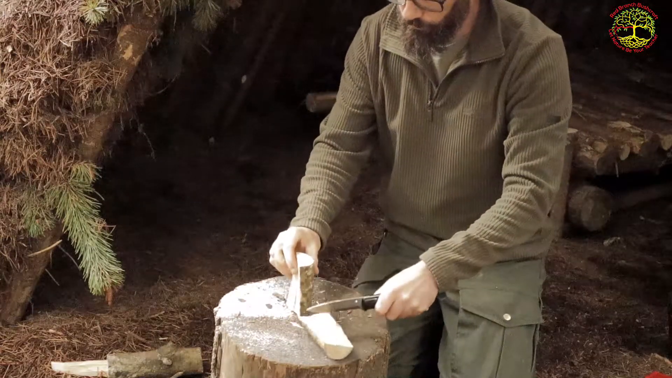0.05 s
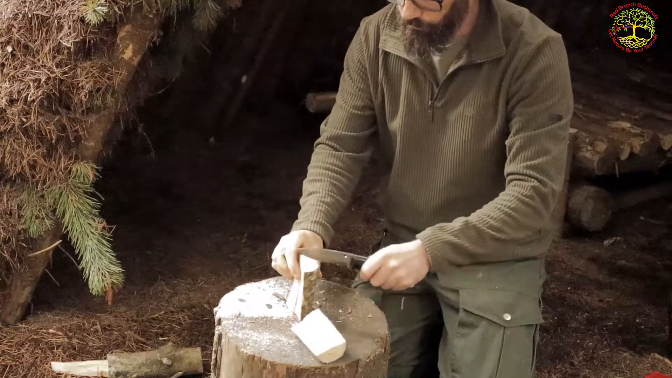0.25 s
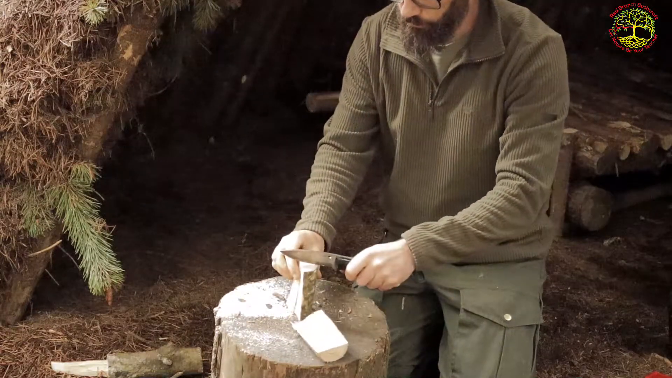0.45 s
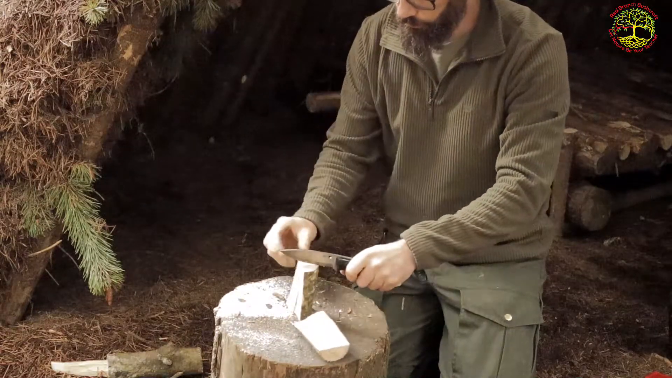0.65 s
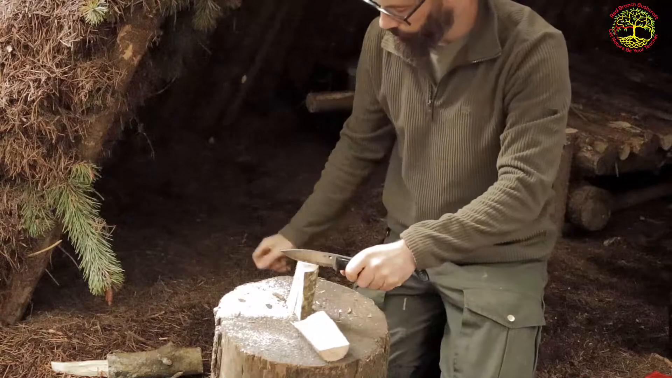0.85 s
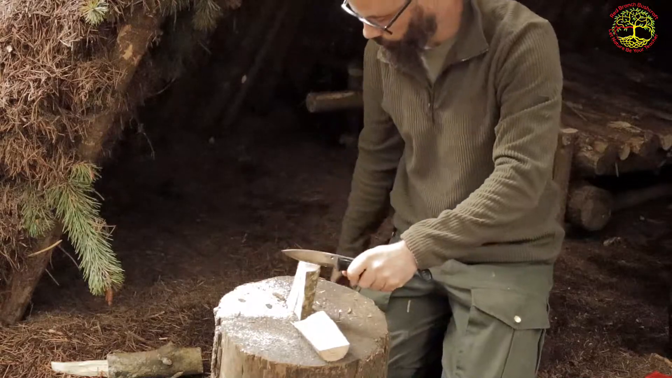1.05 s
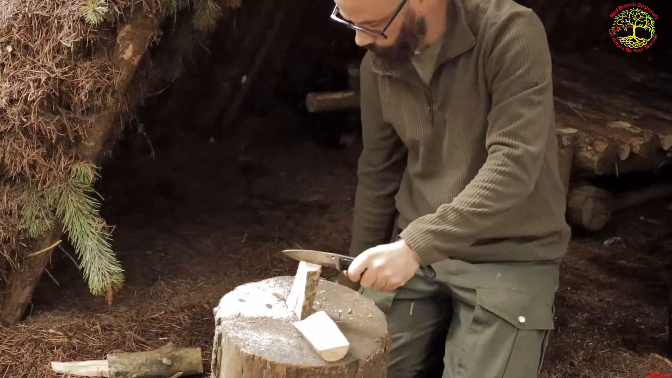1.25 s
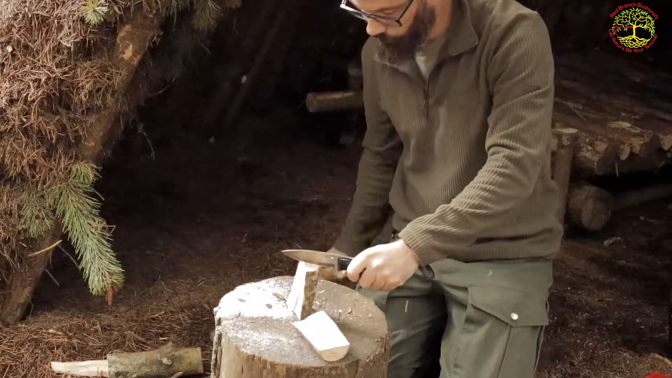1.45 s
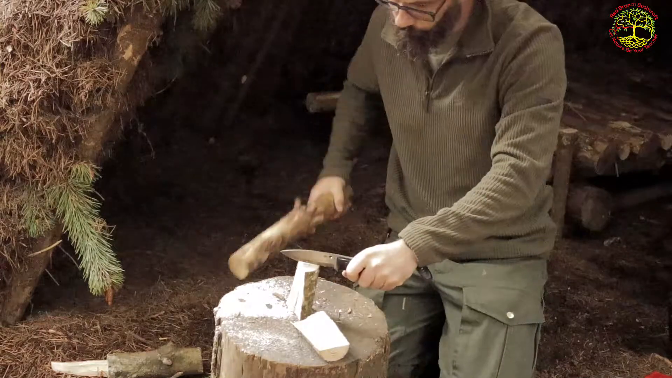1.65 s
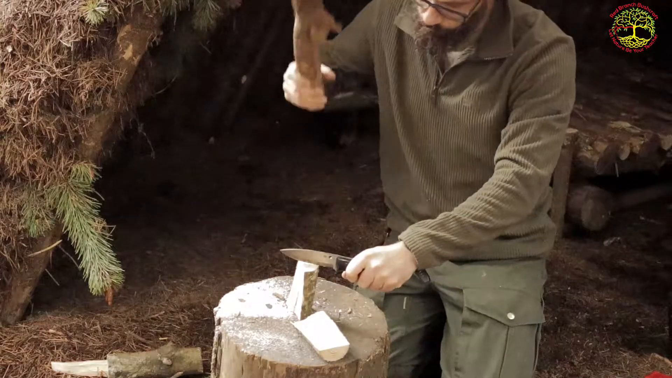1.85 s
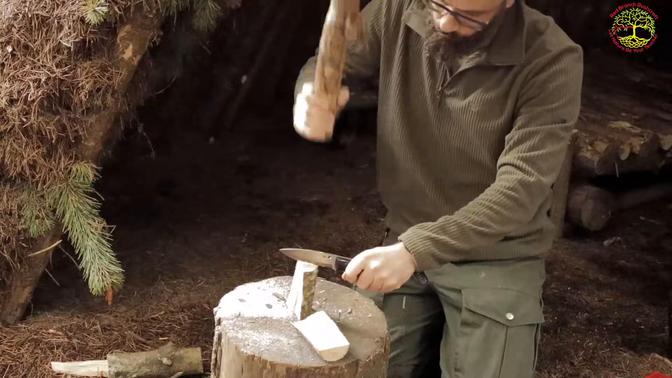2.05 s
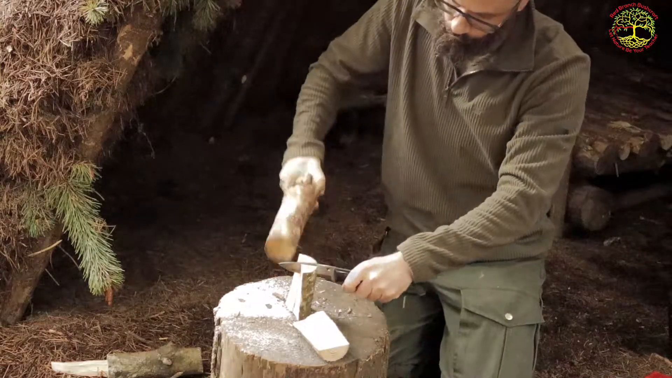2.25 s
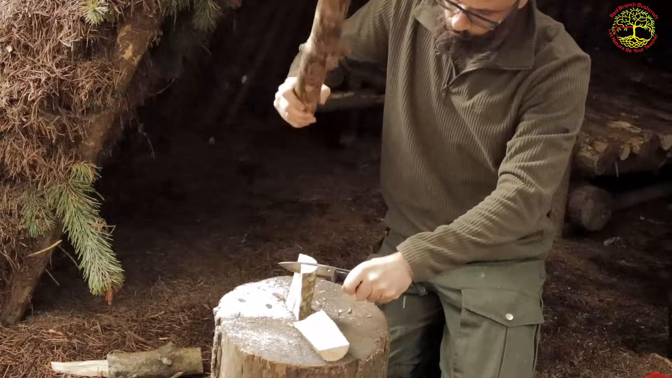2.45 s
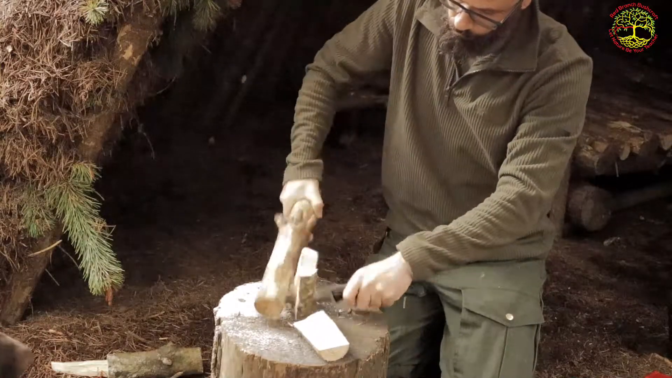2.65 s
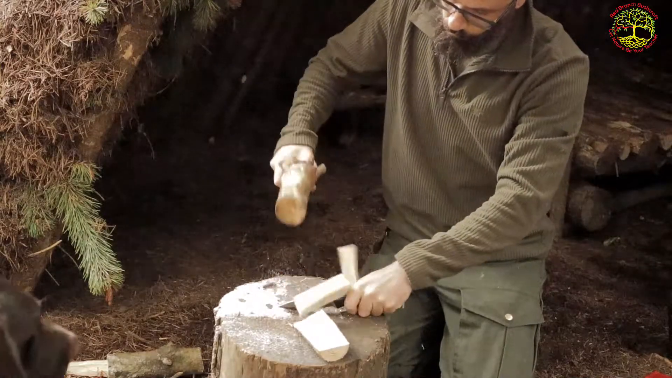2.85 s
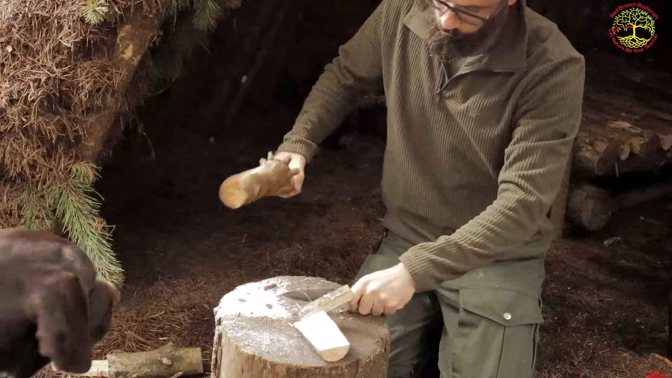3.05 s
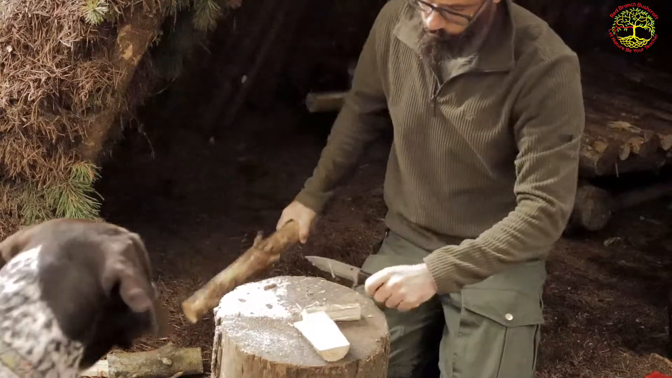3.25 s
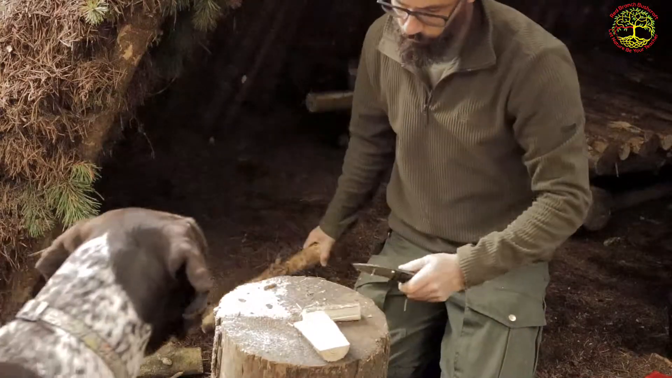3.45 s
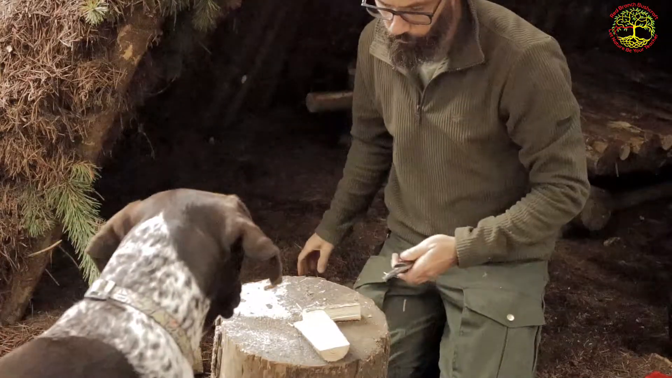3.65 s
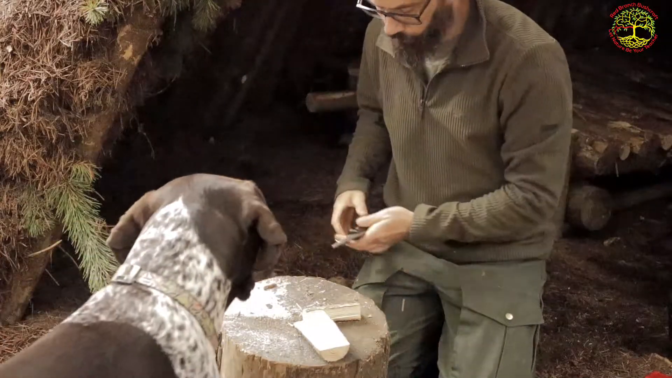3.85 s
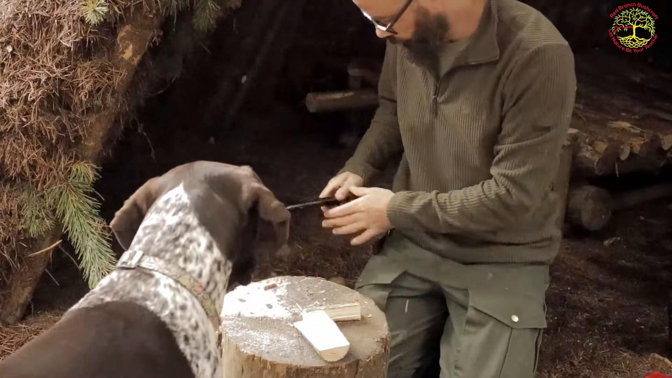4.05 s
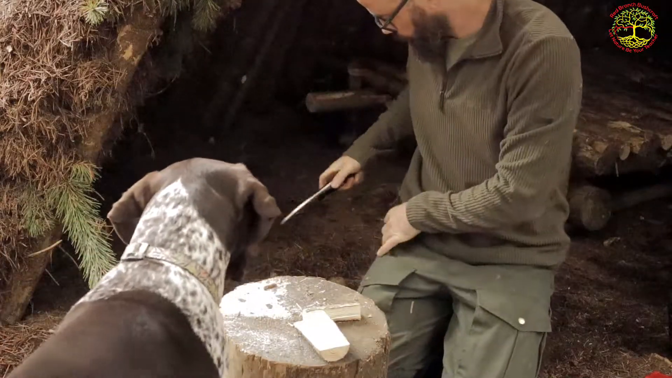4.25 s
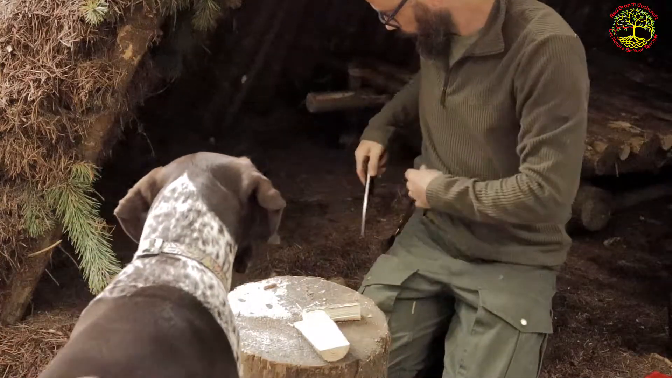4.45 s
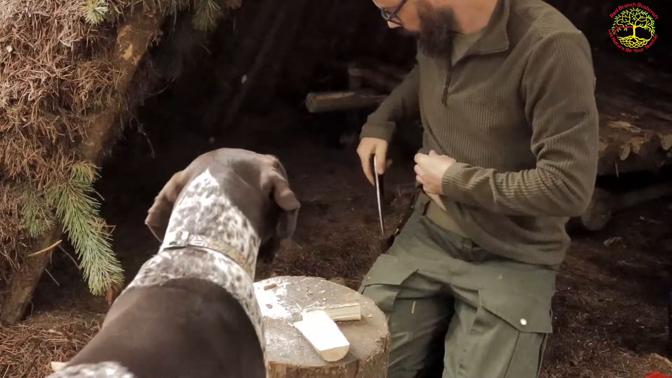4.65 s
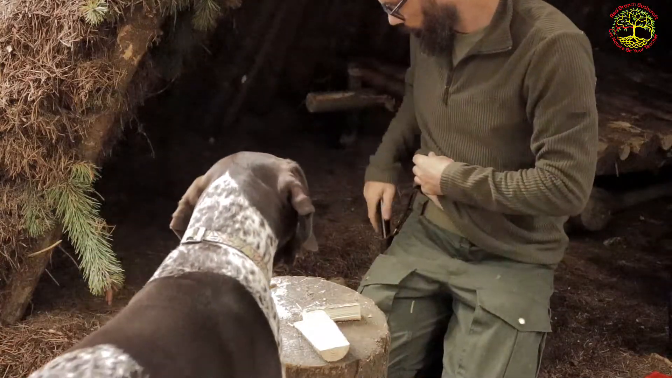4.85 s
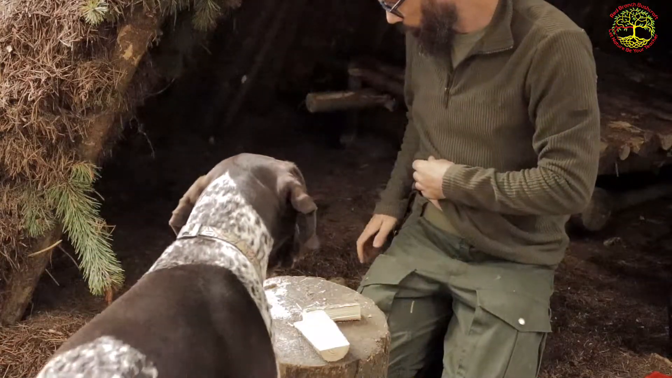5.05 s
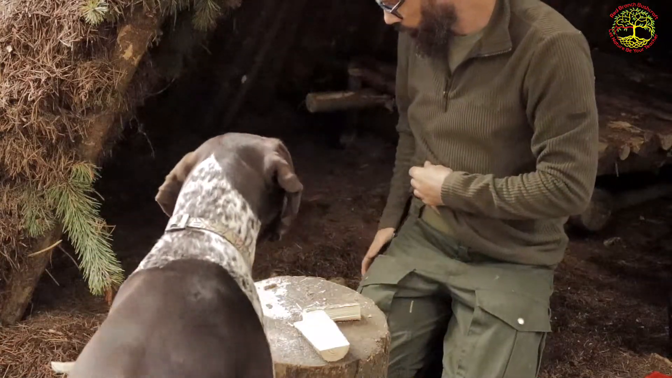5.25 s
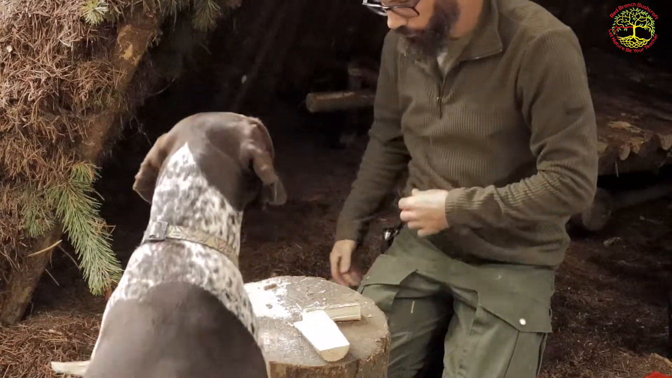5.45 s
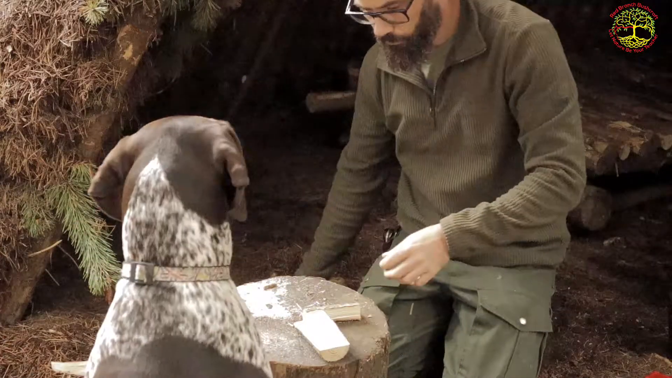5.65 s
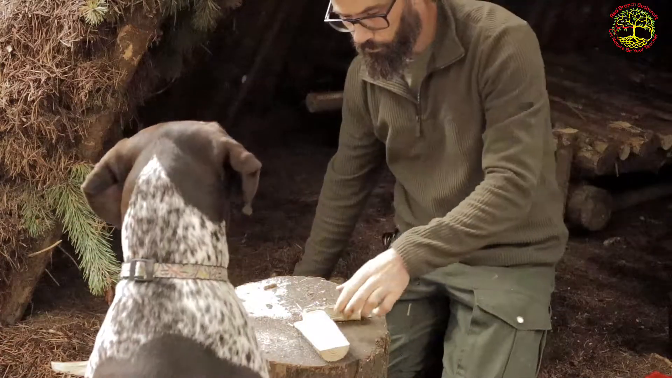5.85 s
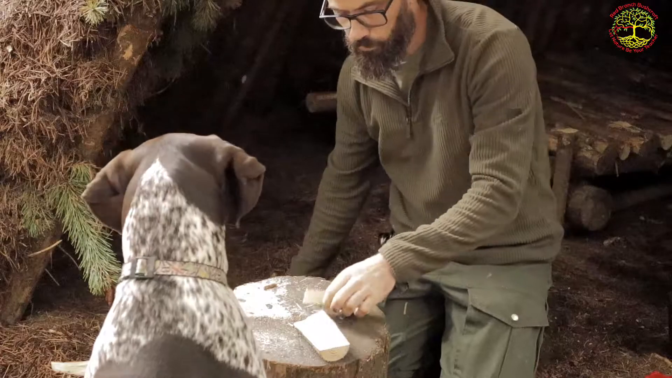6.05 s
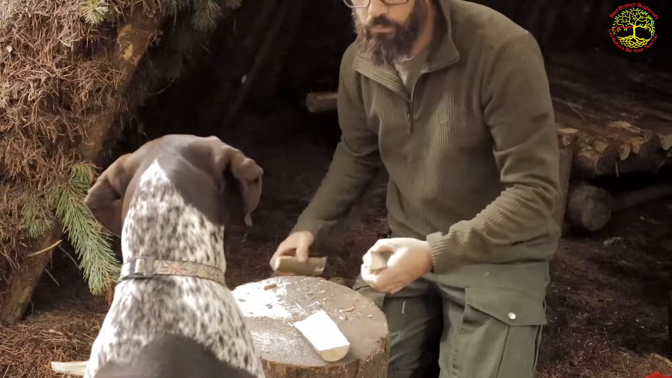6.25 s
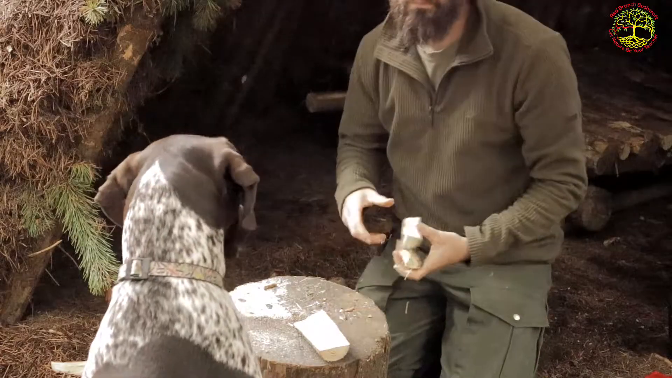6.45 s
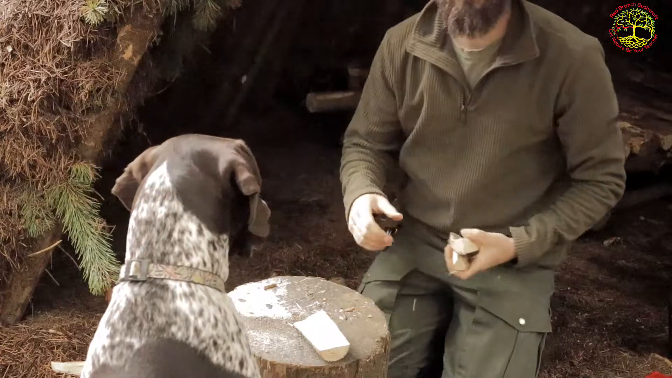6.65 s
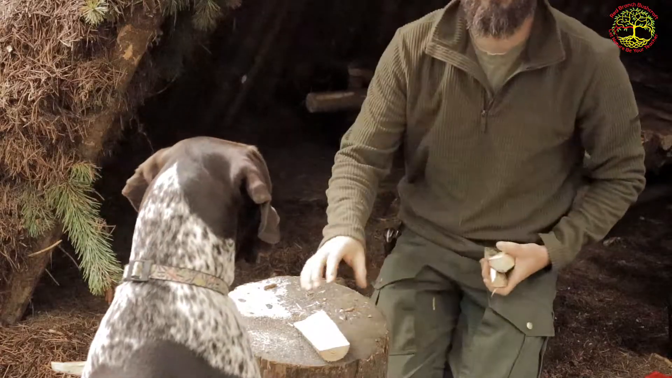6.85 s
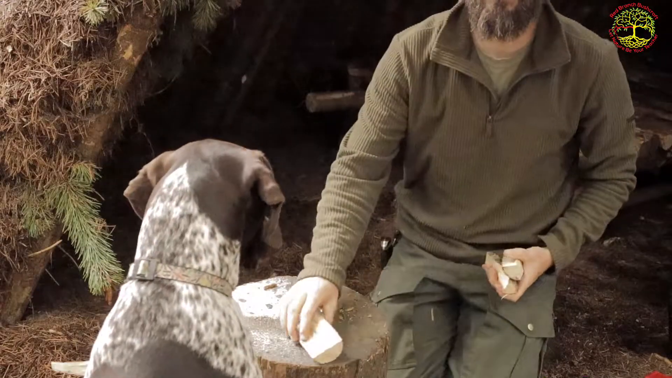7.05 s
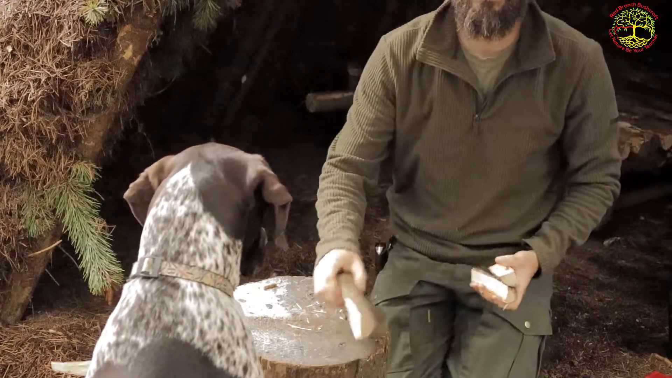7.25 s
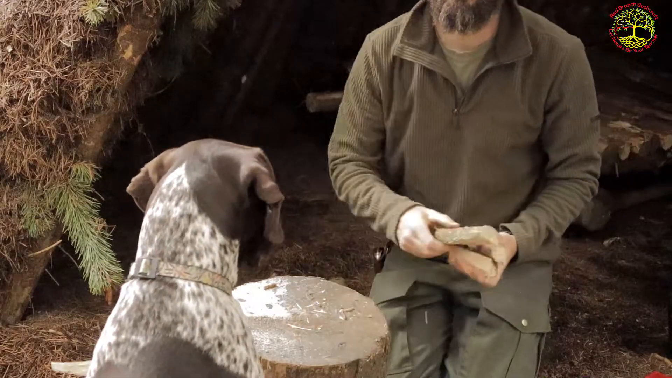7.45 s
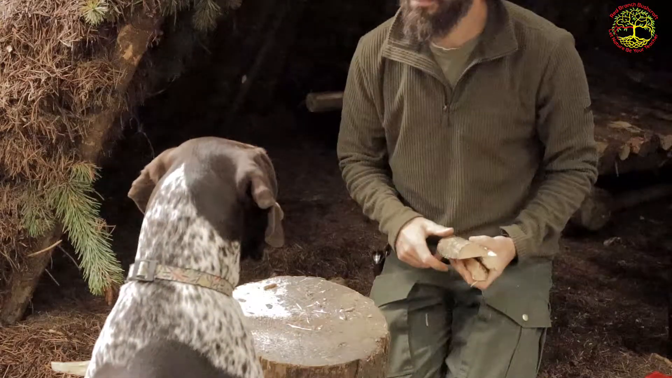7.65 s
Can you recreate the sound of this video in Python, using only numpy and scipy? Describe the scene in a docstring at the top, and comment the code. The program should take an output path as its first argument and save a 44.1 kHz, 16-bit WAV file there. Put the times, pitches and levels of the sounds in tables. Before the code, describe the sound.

Quiet woodland with faint far knocks and a lively whistling songbird; two sharp wooden whacks split a log, then soft thuds and small rustles.

```python
"""A wooden club drives a knife through a small log on a stump, two blows; the pieces fall and bounce, the club
is laid down. Struck wood is a sum of damped modes, its cracks and tears are short noise bursts.
Thuds on soft ground are low damped waves; a songbird's whistles are frequency-modulated sines.
Far knocks on wood, a faint whine and a low hum of filtered noise lie behind.
One microphone; trunks all round return everything near as a haze of decaying noise."""
import sys
import numpy as np
from scipy import signal
from scipy.fft import rfft, irfft, next_fast_len
from scipy.io import wavfile
from scipy.ndimage import uniform_filter1d, map_coordinates

SR = 44100
rng = np.random.default_rng(int(sys.argv[2]) if len(sys.argv) > 2 else 0)


def inscribe(sig):
    """Save sig as 16-bit PCM at rate SR to the path in sys.argv[1].

    A 1-D sig is mono; a 2-D sig holds one channel per row.
    Samples are clipped to [-1, 1] before scaling.
    """
    pcm = np.round(np.clip(np.atleast_2d(sig).T, -1, 1) * 32767)
    wavfile.write(sys.argv[1], SR, pcm.astype(np.int16))


N = 339570  # samples in the scene

# Woodland air, spectra of hush and of rumble: [f/Hz, relative level/dB per Hz]
HUSH_SPECTRUM = [(65, -46.5), (110, -10), (157, -0.5), (583, -4.5), (717, -6), (830, -5.5), (1690, -8.5),
                 (2260, -14), (4580, -18), (16000, -27)]
RUMBLE_SPECTRUM = [(12, -35), (20, -5.5), (49, -6.5), (60, -2.5), (92, -8.5), (140, -13), (180, -39.5),
                   (310, -120)]
# Course of the rumble, before its random lumps: [t/s, level/dB]
RUMBLE_COURSE = [(0, -64.5), (1.5, -69), (3.1, -65), (4.5, -68), (5.3, -66.5), (6.2, -70), (7.35, -68),
                 (7.7, -62.5)]
HUSH_DB = -64.5  # before its drift
# Reverberation among the trunks, and high among the branches: [f/Hz, t60/s before the factor slow]
TREES = [(200, .5), (1000, 0.44), (4000, 0.62), (7000, 0.74), (9000, 0.45), (14000, 0.28)]
CANOPY = [(2000, 0.63), (4000, 0.68), (6000, .45), (7500, 0.42), (9000, .55)]
SMEAR_HZ = 600  # rough bark and leaves blur the pitch of what they return
TOP_HZ = 15750  # upper band limit
# A faint, fuzzy whine that climbs slowly: [t/s, f/Hz, level/dB before its fading]
WHINE = [(.62, 2680, -85), (.75, 2765, -77), (1.25, 2950, -76), (1.6, 2940, -82), (1.9, 2950, -99)]
# Far knocks: [t/s, peak level/dB]
KNOCKS = [(0.251, -38), (0.705, -37), (1.158, -37.5)]
# Returns of each knock from the same trunks: [delay/s, level/dB re knock]
KNOCK_RETURNS = [(.013, -4), (.025, -6.5), (.043, -4), (.05, -10.5), (.062, -2), (.08, -10.5), (.1, -17)]
# Modes of the far hollow wood: [f/Hz, relative level/dB, t60/s]
HOLLOW_MODES = [(442.4, -3.5, 0.056), (536, 2, 0.024), (594, -1.5, 0.032), (788, -3.5, 0.036),
                (990, -3, 0.026), (1410, -12, 0.018), (2030, -19.5, 0.024)]
# Single bird glides, out to a turning pitch and on: [t/s, length/s, start f/Hz, turn f/Hz, end f/Hz,
# share of length before the turn, loudest level/dB before the mix, share before the loudest moment]
GLIDES = [(0.129, 0.033, 6000, 5420, 5400, 0.52, -62, 0.27), (0.19, .02, 5470, 4820, 4240, 0.62, -65, .1),
          (0.272, 0.018, 5800, 4810, 4620, 0.72, -65, .1), (0.356, 0.036, 7350, 6930, 6700, .55, -65, 0.96),
          (.388, 0.029, 6800, 7150, 7100, 0.36, -61.5, .3), (0.496, 0.043, 7000, 6580, 6220, 0.39, -62, .2),
          (.592, .028, 4100, 4700, 4930, .6, -60, .65), (0.697, 0.029, 5480, 6100, 5450, 0.37, -51.5, 0.35),
          (1.497, .048, 8250, 8090, 8700, 0.37, -64, 0.37), (1.558, .02, 8200, 7650, 7300, .55, -63, .8),
          (1.611, 0.033, 6570, 5840, 5420, 0.31, -47.5, 0.54),
          (1.642, 0.056, 5456, 5880, 6100, 0.53, -47.5, 0.36),
          (1.743, .022, 4050, 3900, 3280, .5, -62.5, .3), (1.798, 0.06, 6970, 8130, 8600, 0.52, -58, 0.27),
          (2.015, 0.15, 4282, 4065, 4050, .3, -57.5, 0.21),
          (2.349, 0.016, 5170, 6300, 6850, 0.42, -55.5, 0.41),
          (2.368, 0.04, 6870, 6300, 6300, 0.62, -47.5, 0.96),
          (3.219, 0.073, 5610, 5175, 5900, 0.6, -48.5, 0.39),
          (3.715, 0.0405, 7680, 7340, 7590, 0.51, -55.5, 0.6),
          (3.756, 0.26, 7600, 7330, 7100, 0.57, -56, .45), (4.011, .092, 5770, 5300, 3800, .6, -48, 0.38),
          (4.995, 0.016, 6040, 7000, 7400, 0.43, -52, 0.83),
          (5.009, 0.058, 7410, 5220, 4990, 0.66, -49, 0.46),
          (5.065, 0.05, 4980, 6050, 6050, 0.74, -48.5, .9), (5.726, 0.21, 4906, 4597, 4450, 0.14, -53, .12),
          (5.882, 0.016, 5580, 5800, 5900, 0.52, -50, .9),
          (5.894, 0.094, 5900, 5190, 3620, 0.67, -51.5, 0.64),
          (6.082, 0.026, 7220, 7900, 8420, 0.44, -66.5, 0.62),
          (6.103, .14, 8580, 7300, 5920, 0.8, -57.5, 0.86)]
SWELL_DB, FADE_DB = 110, 90  # dB per s, before and after the loudest moment of a glide
EDGE_DB = 6.5  # further softening at its start and end
WAVER_HZ, WAVERS = 70, 55  # spread of the pitch wander in Hz; random knots per s
# Syllables of the song: [t/s after the start, f/Hz, level/dB re phrase]
HOOK = [(0.005, 5780, 2.5), (0.012, 6684, -17), (0.02, 6900, -24.5), (0.045, 6250, -10),
        (0.068, 5950, -2.5), (0.082, 5030, -8), (0.095, 4240, -8.5)]
RISE = [(0, 3160, -10), (0.01, 4130, -1.5), (0.022, 5150, 12.5)]
SCOOP = [(0, 7580, -10.5), (0.02, 6910, -6), (0.045, 6380, -3.5), (0.07, 6570, -5.5), (0.1, 6710, -8.5),
         (0.13, 7040, -11)]
FLICK = [(0, 5200, -13), (0.007, 5630, -8.5), (0.014, 6160, 5)]
CLIMB = [(0, 3504, -12.5), (0.03, 4000, -5), (0.055, 4140, 2), (0.065, 4810, 1), (0.075, 5700, -3)]
TRILL = [(0, 5410, 3), (0.006, 5800, 3.5), (0.015, 4780, 3), (0.024, 4210, -6.5), (0.038, 3650, -16)]
VEE = [(0, 7230, -15), (0.012, 7000, -16), (0.025, 6325, 1), (0.045, 5440, -0.5), (0.06, 5200, -4.5),
       (0.085, 5750, -4.5), (0.11, 6114, 0.5)]
TICK = [(0, 6604, -2), (.0045, 4400, -0.5)]
# Phrases: [shape = syllable, s = start t/s, every = period/s, count = times sung]
SONG = [dict(shape=TICK, s=.638, every=.028, count=2), dict(shape=HOOK, s=.76, every=.1817, count=4),
        dict(shape=RISE, s=.882, every=.1822, count=4), dict(shape=TICK, s=2.136, every=.0265, count=4),
        dict(shape=FLICK, s=2.472, every=.1835, count=4), dict(shape=SCOOP, s=2.501, every=.1843, count=4),
        dict(shape=CLIMB, s=3.385, every=.176, count=2), dict(shape=TRILL, s=4.148, every=.0696, count=12),
        dict(shape=FLICK, s=5.158, every=.181, count=2), dict(shape=VEE, s=5.187, every=.1855, count=3)]
# Effort of each phrase: [level/dB of the first syllable before the mix, change/dB with each repeat]
EFFORT = [(-59.5, 1), (-48.3, 0.9), (-63, .9), (-62, 2), (-50, 1.1), (-51.5, 0.1), (-56.5, 2),
          (-55.3, 0.03), (-52.5, -4), (-50, 0.1)]
# Soft thuds on the needle-covered ground: [t/s, level/dB, push f/Hz, soil ring/dB before a common gain]
THUDS = [(3.176, -43, 203.3, -15), (3.201, -33.5, 172.5, -9.5), (3.6, -46.5, 179, -20.5),
         (4.293, -42.5, 167, -20.5), (5.311, -41, 183, -12)]
# Resonance of the soil: [f/Hz, t60/s]
SOIL = (88.3, 0.2)
# The stump passes blows through the ground to the microphone stand: [t/s, level/dB, f/Hz, t60/s]
SHUDDER = [(2.265, -30, 67, 0.18), (2.28, -44, 43.9, 0.78), (2.785, -41, 45, 0.26),
           (2.931, -45, 49.2, 0.28), (5.27, -49, 37, 0.483)]
# Dry crackles of bark, splinters and cloth: [t/s, peak level/dB, centre f/Hz, spread/octaves, length/s]
CRACKLES = [(.321, -61, 3500, .7, .0016), (1.904, -52, 5000, .8, 0.0014), (2.2482, -28.5, 10970, .3, .004),
            (2.743, -31, 8600, 0.21, .004), (2.753, -33, 9510, 0.29, 0.0017),
            (2.758, -41, 9070, .37, 0.0055), (2.769, -41.5, 8500, .3, .0025),
            (2.914, -51, 9000, 0.13, .001), (3.201, -56.5, 4230, .1, 0.0044),
            (3.321, -60, 4000, 0.09, .006), (4.592, -51.5, 2970, .55, .003),
            (6.555, -47.5, 6580, 0.73, .0056), (7.317, -54.5, 5040, 0.55, 0.011),
            (7.531, -52, 1740, 0.35, .0014), (7.544, -46.5, 4400, 0.62, .005),
            (7.567, -36, 5600, 0.55, 0.0036), (7.573, -30, 8260, 0.46, .002),
            (7.575, -49, 6000, .64, 0.021), (7.598, -60, 4180, .15, .0043), (7.607, -60, 4470, .17, .0064)]
# Spectrum of a splitting crack: [f/Hz, relative level/dB per Hz]
SPLIT_SPECTRUM = [(200, -30.5), (800, -1), (2000, 2.5), (4500, -4), (5200, -16.5), (9000, -20.5),
                  (12000, -27), (15500, -42.5)]
# The blade tears fibres apart: [t/s, level/dB, decay time/s]
TEARS = [(2.2482, -28, .0018), (2.2493, -10.5, 0.0025), (2.2519, -19.5, 0.0087), (2.26, -47, .015),
         (2.742, -24, 0.01), (2.7688, -46, 0.0099), (2.819, -42, 0.0018), (2.85, -53, 0.0027)]
# Modes of the freed half of the log, which rings longer: [f/Hz, relative level/dB, t60/s]
BILLET_MODES = [(828, 0.5, 0.056), (907, 1.5, 0.024), (2090, -17, 0.076), (2850, -22, .035),
                (3240, -30, 0.043)]
# Knocks on that half as it falls: [t/s, level/dB]
TUMBLE = [(2.7427, -18), (2.7705, -19.5), (2.8208, -33), (2.851, -45.5)]
# Modes of the dry wood of log, club and stump: [f/Hz, relative level/dB, t60/s before the ring factor]
WOOD_MODES = [(240, -1, 0.067), (409.6, -2, 0.032), (501.8, -4, 0.029), (680, -2, 0.04),
              (784.8, -5.5, 0.032), (900.8, -2.5, 0.069), (1150, -0.5, .035), (1454.5, -1.5, 0.028),
              (1680.3, -5, 0.013), (2020, -4.5, .035), (2166, -7, 0.019), (2432, -10.5, 0.048),
              (2620.4, -15, 0.025), (3410, -10, .03), (3750, -11.5, 0.023), (4170, -13.5, 0.071)]
# Contacts of wood on wood or steel: [t/s, peak level/dB of the ring, favoured f/Hz, spread/octaves,
# ring factor on t60]
CONTACTS = [(2.2491, -1, 1090, 0.99, 0.38), (2.2524, -1.5, 1150, .7, .45), (2.26, -16, 960, .97, 0.46),
            (2.289, -33.5, 298, 1.3, 0.24), (2.742, -7.5, 890, 0.65, 0.33),
            (2.7682, -15.5, 1115, 1.47, 0.62), (2.821, -30, 590, 0.44, 0.2), (2.833, -48.5, 4300, 0.15, .6),
            (2.85, -48, 4000, 0.25, .35), (2.9169, -27, 1520, 0.33, 0.11), (2.927, -42, 1630, 0.29, 0.34),
            (2.979, -36.5, 385, 1.04, 0.55), (2.9885, -24.5, 543, 0.29, 0.32),
            (3.707, -45, 948, 0.47, 0.45), (3.715, -46.5, 880, 0.17, .94), (4.895, -50.5, 430, 0.35, 0.68),
            (4.984, -49.5, 680, 0.38, .9), (4.995, -45.5, 540, 0.5, 0.87), (5.018, -51, 593, 0.57, 0.89),
            (5.045, -50, 592, 0.38, 0.72), (5.314, -49.5, 822, 1, 0.29), (6.57, -53.5, 798, 1.1, .3),
            (7.545, -53.5, 4000, .35, 0.53), (7.546, -53, 519, 0.57, 0.66), (7.566, -49, 600, 0.8, 0.5),
            (7.568, -45, 3800, 0.43, 0.37), (7.573, -47, 523, .45, 0.26), (7.5743, -40.5, 3900, 0.49, 0.21)]
HARD_RISE_S, SOFTENS_DB = .0005, .16  # rise at 0 dB; longer by this many dB for each dB weaker
CRACK_DB, CRACK_S = -17.5, .004  # snap of every contact, relative to its ring; decay time
SCATTER = 0.013  # relative shift of the modes with grip and place


def amp(db):
    """A level in dB is the logarithm of an amplitude; this inverts it."""
    return 10 ** (np.asarray(db) / 20)


def unit(x):
    """Normalization to unit root mean square."""
    return x / np.sqrt(np.mean(x ** 2) + 1e-20)


def along(points, hz):
    """Interpolation of (f, value) points on a logarithmic frequency axis."""
    f, v = np.transpose(points)
    return np.interp(np.log(hz + 1), np.log(f + 1), v)


def add(track, s, sound):
    """Superposition: a sound is summed into the track at s seconds."""
    part = track[round(s * SR):][:len(sound)]
    part += sound[:len(part)]


def filtered(x, response):
    """Linear filtering: the spectrum is multiplied by a response of frequency."""
    m = next_fast_len(len(x) + SR // 2)
    return irfft(rfft(x, m) * response(np.fft.rfftfreq(m, 1 / SR)), m)[:len(x)]


def band(hz, centre_hz, octaves):
    """Band-pass weighting: a Gaussian gain in octaves around a centre."""
    return np.exp(-.5 * (np.log2((hz + 1) / centre_hz) / octaves) ** 2)


def ring(t, hz, t60, attack, phase=0):
    """Free damped vibration: a sine that decays exponentially after a soft start."""
    return np.sin(2 * np.pi * hz * t + phase) * amp(-60 * t / t60) * (1 - np.exp(-t / attack))


def any_phase():
    """Random phase of a mode, in radians."""
    return rng.uniform(0, 2 * np.pi)


def slow_noise(positions, knots):
    """Random fluctuation: a smooth curve through random knots."""
    return map_coordinates(rng.standard_normal(knots), [positions])


def haze(x, decay, slow, gap):
    """Diffuse reverberation from the trunks after a gap in s: each frequency decays at its own rate."""
    # Every quarter second of sound gets a freshly drawn noise tail, cross-faded, so no fixed tone stands out
    out, hop = np.zeros(N + 2 * SR), SR // 4
    window = signal.get_window("hann", 2 * hop)
    padded = np.pad(x, (hop, 2 * hop))
    for start in range(0, N + hop, hop):
        hz, t, z = signal.stft(rng.standard_normal(3 * hop), SR, nperseg=256)
        t60 = slow * along(decay, hz)[:, None]
        tail = signal.istft(z * amp(-60 * t / t60), SR, nperseg=256)[1]
        piece = padded[start:start + 2 * hop] * window
        add(out, start / SR + gap, signal.fftconvolve(piece, tail / np.linalg.norm(tail)))
    return out[hop:hop + N]


def air():
    """Broadband noise: a patchy hush that drifts with the breeze, over a lumpy low rumble."""
    t = np.arange(N) / SR
    z = signal.stft(rng.standard_normal(N + 512), nperseg=512)[2]
    # Patches are gains smoothed over frequency, then time
    patches = uniform_filter1d(rng.standard_normal(z.shape), size=8, axis=0)
    patches = uniform_filter1d(patches, size=16, axis=1)
    noise = signal.istft(z * amp(.8 * unit(patches)), nperseg=512)[1][:N]
    hush = unit(filtered(noise, lambda f: amp(along(HUSH_SPECTRUM, f))))
    rumble = unit(filtered(rng.standard_normal(N), lambda f: amp(along(RUMBLE_SPECTRUM, f))))
    hush_db = HUSH_DB + 0.39 * slow_noise(t * 1.5, 60)
    rumble_db = np.interp(t, *np.transpose(RUMBLE_COURSE)) + .51 * slow_noise(t * 6, 60)
    return amp(hush_db) * hush + amp(rumble_db) * rumble


def whistle(rows, waver_hz=WAVER_HZ):
    """Frequency modulation: the phase integrates a slightly unsteady pitch along (s, Hz, dB) rows."""
    s, hz, db = np.transpose(rows)
    t = np.arange(s[0], s[-1], 1 / SR)
    waver = waver_hz * slow_noise((t - s[0]) * WAVERS, 200)
    steady = uniform_filter1d(np.interp(t, s, hz), size=90, mode="nearest")
    pitch = steady + waver * np.clip((t - s[0]) / .06, 0, 1)  # the waver sets in gradually
    fade = np.clip(np.minimum(t - s[0], s[-1] - t) / 0.0034, 0, 1)
    return np.sqrt(2) * amp(np.interp(t, s, db)) * fade * np.sin(2 * np.pi * np.cumsum(pitch) / SR)


def whine():
    """Amplitude modulation: a gliding tone fades in and out fast at random."""
    out, tone = np.zeros(N), whistle(WHINE, waver_hz=12)
    fading = slow_noise(np.arange(len(tone)) / SR * 150, 400)
    add(out, WHINE[0][0], tone * (0.52 + 0.76 * fading))
    return out


def far_knocks():
    """Reflection: hollow modes, discrete returns from fixed trunks, and much haze."""
    direct, returns, t = np.zeros(N), np.zeros(N), np.arange(SR // 10) / SR
    for s, db in KNOCKS:
        knock = sum(amp(level) * ring(t, hz, t60, 0.00086, any_phase()) for hz, level, t60 in HOLLOW_MODES)
        add(direct, s, amp(db) * knock / abs(knock).max())
        for delay, echo_db in KNOCK_RETURNS:
            # Returns are duller and smeared: the low modes survive, in a new mix
            dull = sum(amp(level + rng.normal(0, 2.4)) * ring(t, hz, t60, 0.0072, any_phase())
                       for hz, level, t60 in HOLLOW_MODES[:3])
            add(returns, s + delay, amp(db + echo_db) * dull / abs(dull).max())
    tail = haze(amp(1) * direct + amp(-8.5) * returns, TREES, slow=2.3, gap=0.013)
    # The soft ground cancels the bass
    high_pass = signal.butter(4, 380 / (SR / 2), "high", output="sos")
    return signal.sosfilt(high_pass, direct + returns + tail)


def glide(length, start_hz, turn_hz, end_hz, turn, db, loudest):
    """Piecewise-linear glide: pitch turns once, level swells to its loudest moment and fades."""
    u = np.unique(np.clip([0, turn, loudest, 1], 0, 1))
    start_db = db - EDGE_DB - SWELL_DB * loudest * length
    end_db = db - EDGE_DB - FADE_DB * (1 - loudest) * length
    pitch = np.interp(u, [0, turn, 1], [start_hz, turn_hz, end_hz])
    level = np.interp(u, [0, loudest, 1], [start_db, db, end_db])
    return np.transpose([u * length, pitch, level])


def phrase(db, swell_db, shape, s, every, count):
    """Periodic repetition of a syllable, with random variation of pitch and level."""
    out = np.zeros(N)
    for k in range(count):
        sung = np.multiply(shape, [1, rng.normal(1, 0.004), 1])
        sung = sung + np.outer(rng.normal(0, 1.07, len(shape)), [0, 0, 1])
        add(out, s + k * every + shape[0][0], amp(db + k * swell_db) * whistle(sung))
    return out


def songbird():
    """Direct-to-reverberant ratio: the song comes from some way off, so its haze is nearly as strong."""
    out = sum(phrase(db, swell_db, **part) for part, (db, swell_db) in zip(SONG, EFFORT))
    for s, *note in GLIDES:
        add(out, s, whistle(glide(*note)))
    # Nearby branches roughen the tone; the far trunks add the long tail
    branches = haze(out, CANOPY, slow=0.17, gap=0.0015)
    trunks = haze(out, CANOPY, slow=1.0, gap=0.0092)
    return amp(-1.5) * out + amp(-4.5) * branches + amp(-2) * trunks


def ground():
    """Impact on a lossy medium: a low push and a dull, late-swelling ring; the stand shudders too."""
    out, t = np.zeros(N), np.arange(SR // 2) / SR
    for s, db, hz, ring_db in THUDS:
        push = ring(t, hz, 0.028, 0.00049, np.pi / 2)
        soil = amp(ring_db + 14.0) * ring(t, SOIL[0], SOIL[1], 0.064)
        add(out, s, amp(db) * (1.24 * push + soil))
    for s, db, hz, t60 in SHUDDER:
        add(out, s, amp(db) * ring(t, hz, t60, .03))
    return out


def crackles():
    """Impulsive noise: each crackle is a short, band-limited clump of spikes."""
    out, t = np.zeros(N), np.arange(SR // 20) / SR
    for s, db, hz, spread, length in CRACKLES:
        spikes = rng.standard_normal(len(t)) * amp(6.3 * rng.standard_normal(len(t)))
        envelope = np.exp(-(t / length) ** 2) * (1 - np.exp(-t / 0.0003207))
        clicks = filtered(spikes, lambda f: band(f, hz, spread)) * envelope
        add(out, s, amp(db) * clicks / abs(clicks).max())
    return out


def crack(t, length):
    """Fracture: a burst of splitting noise that decays exponentially."""
    noise = unit(filtered(rng.standard_normal(len(t)), lambda f: amp(along(SPLIT_SPECTRUM, f))))
    return noise * np.exp(-t / length) * (1 - np.exp(-t / 0.00019))


def tearing():
    """Successive fracture: fibres part in bursts of noise as the blade goes in."""
    out, t = np.zeros(N), np.arange(SR // 4) / SR
    for s, db, length in TEARS:
        add(out, s, amp(db) * crack(t, length))
    return out


def billet():
    """Modal superposition: the loose piece rings each time it is knocked on its way down."""
    out, t = np.zeros(N), np.arange(SR // 5) / SR
    for s, db in TUMBLE:
        tone = sum(amp(level) * ring(t, hz, t60, 0.00048, any_phase()) for hz, level, t60 in BILLET_MODES)
        add(out, s, amp(db) * tone)
    return out


def wood():
    """Modal excitation: a contact rings modes near its favoured pitch, with a snap; weak ones rise slowly."""
    out, t = np.zeros(N), np.arange(SR // 4) / SR
    for s, db, hz, spread, lasting in CONTACTS:
        rise = HARD_RISE_S * amp(-SOFTENS_DB * db)
        tone = np.zeros(len(t))
        for f, level, t60 in WOOD_MODES:
            mode = ring(t, f * rng.normal(1, SCATTER), t60 * lasting, rise, any_phase())
            tone += amp(level) * band(f, hz, spread) * mode
        snap = amp(CRACK_DB) * crack(t, CRACK_S)
        add(out, s, amp(db) * (tone / abs(tone).max() + snap))
    # Small pieces of wood radiate no deep bass
    return signal.sosfilt(signal.butter(5, 150 / (SR / 2), "high", output="sos"), out)


def scene():
    """Superposition of sources: near ones get a short haze and a faint, blurred one from the trees."""
    near = wood() + billet() + tearing() + crackles()
    blur = unit(filtered(rng.standard_normal(N), lambda f: 1 / (1 + (f / SMEAR_HZ) ** 2)))
    trees = haze(near * blur, TREES, slow=0.82, gap=0.018)
    trees = filtered(trees, lambda f: band(f, 2100, 1.7))
    near = near + amp(-17.5) * haze(near, TREES, slow=0.11, gap=0.0056) + amp(-28) * trees
    return (air() + whine() + far_knocks() + songbird() + ground() + near)[None]


def record(dry):
    """Saturation and band limit: the loudest peaks flatten towards full scale, then the top is cut."""
    flat = dry[0] / (1 + abs(dry[0]) ** 8) ** (1 / 8)
    return filtered(flat, lambda hz: hz < TOP_HZ)[None]


dry = scene()
out = record(dry)
inscribe(out)
```